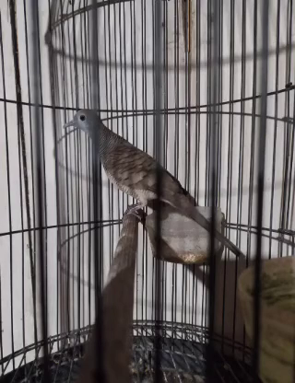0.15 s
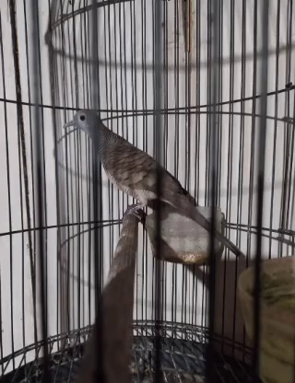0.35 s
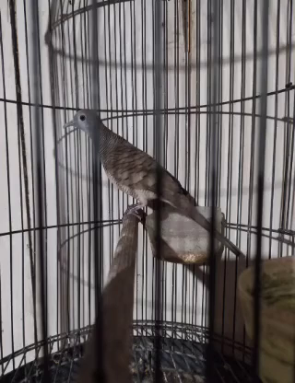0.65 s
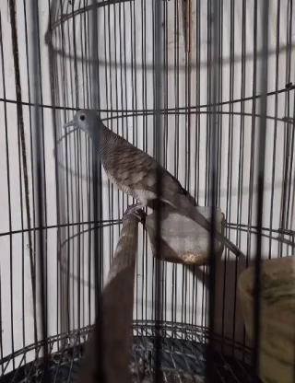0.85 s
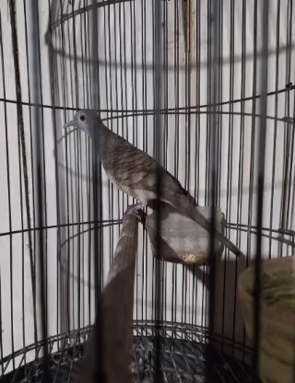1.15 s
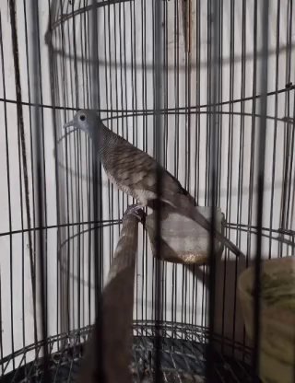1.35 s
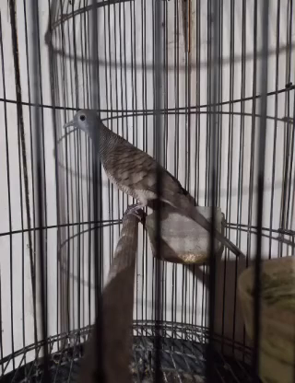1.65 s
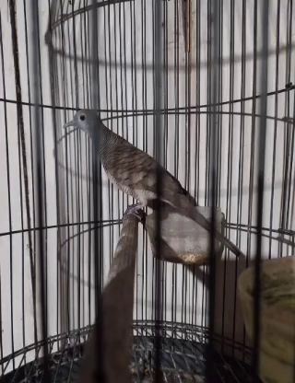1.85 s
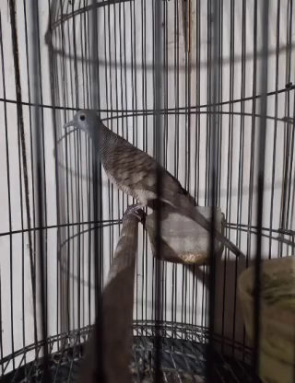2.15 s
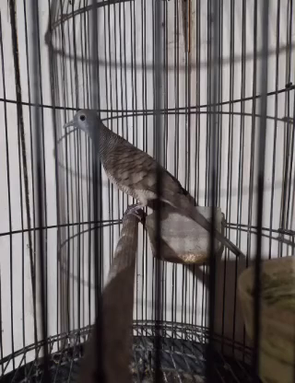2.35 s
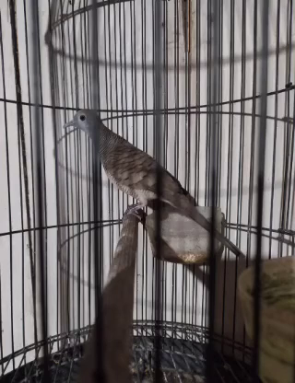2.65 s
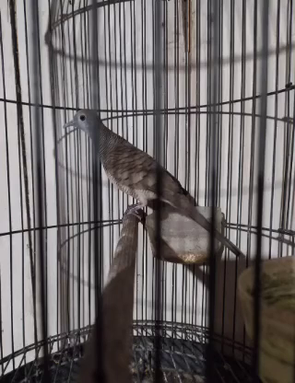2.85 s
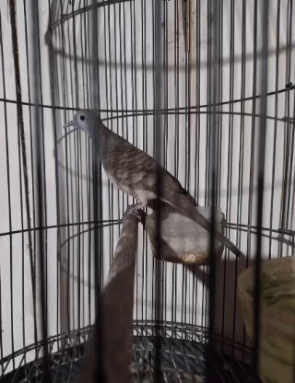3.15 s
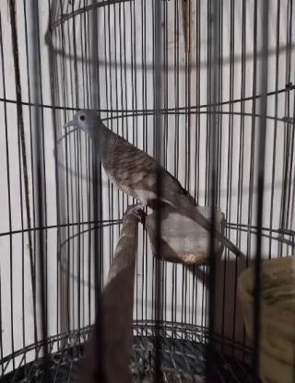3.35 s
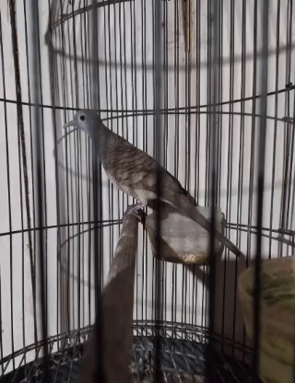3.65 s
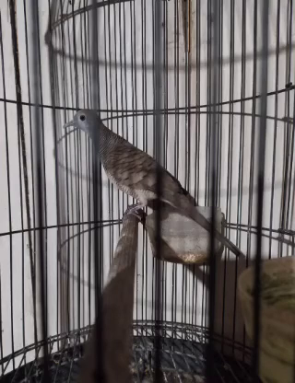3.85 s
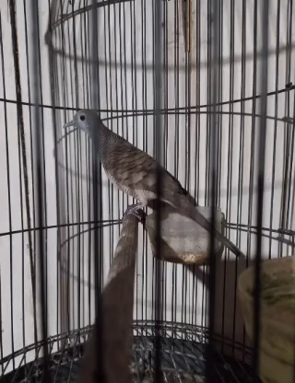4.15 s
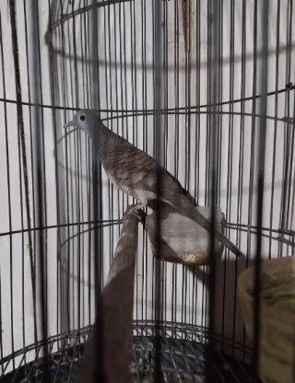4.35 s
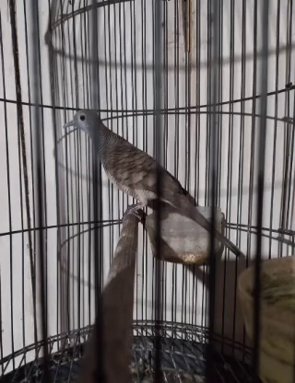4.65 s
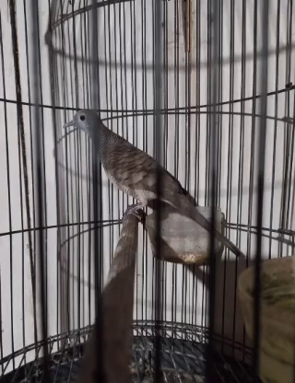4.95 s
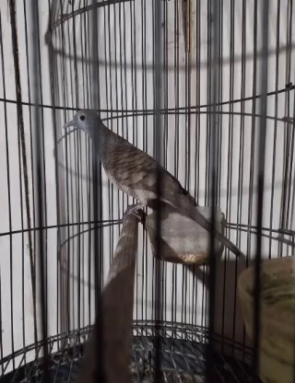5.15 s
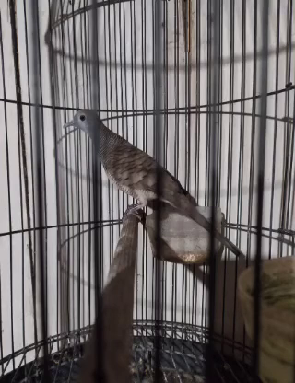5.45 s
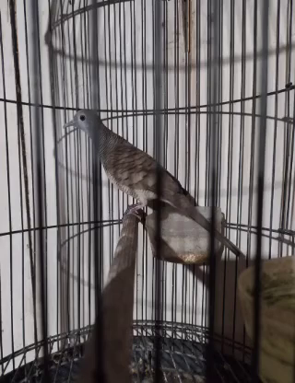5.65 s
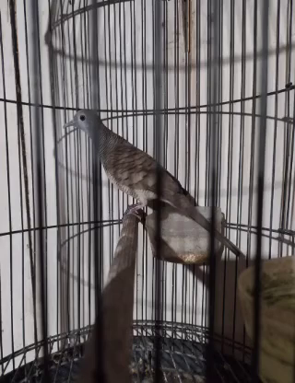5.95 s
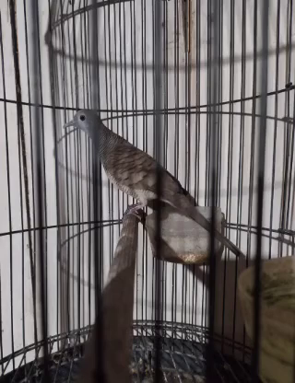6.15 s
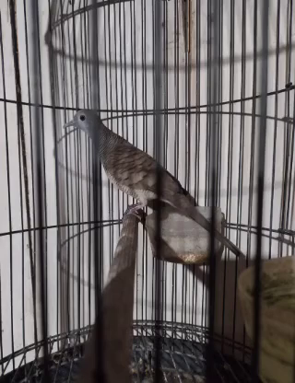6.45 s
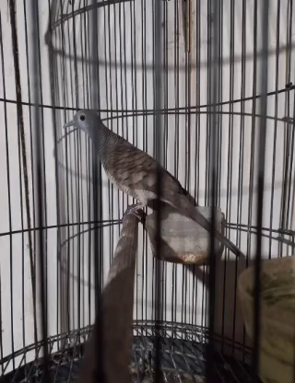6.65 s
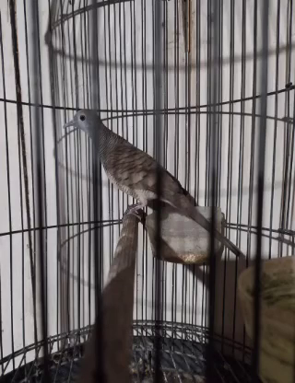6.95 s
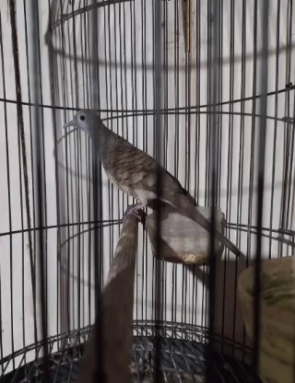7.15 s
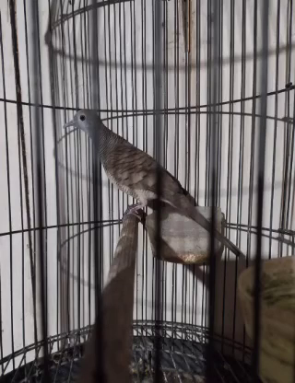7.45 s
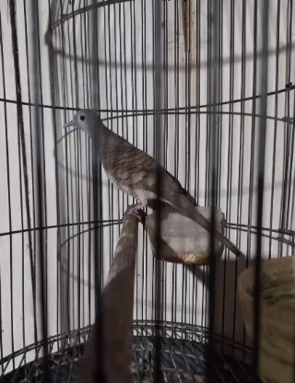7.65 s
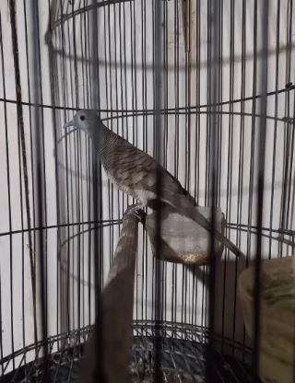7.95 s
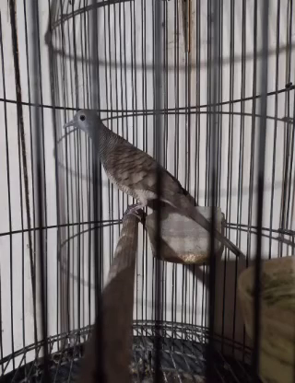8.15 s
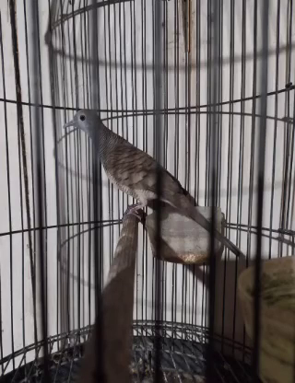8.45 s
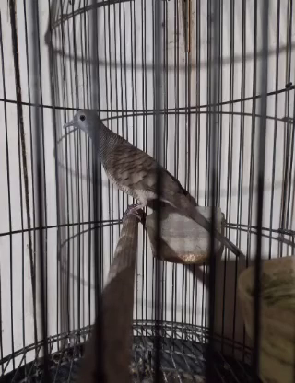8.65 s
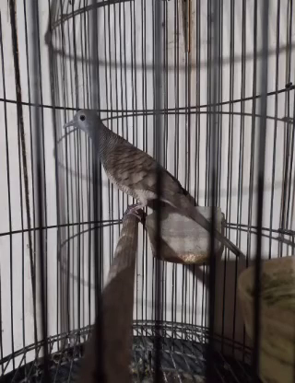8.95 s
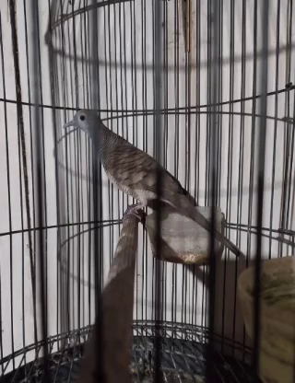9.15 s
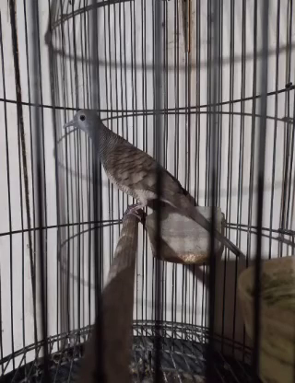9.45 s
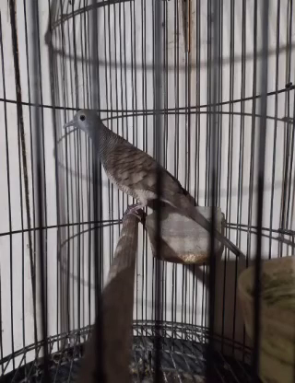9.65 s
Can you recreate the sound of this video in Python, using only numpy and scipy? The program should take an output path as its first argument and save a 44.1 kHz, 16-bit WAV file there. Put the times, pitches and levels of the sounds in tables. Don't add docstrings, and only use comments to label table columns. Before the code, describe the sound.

Hollow, reedy dove coos around a mid-high whistle pitch, loud and dry with slight wall echo. Four even coos come first, then four separate rapid phrases with gaps between. One soft distant reply follows the first phrase. Near the end a second bird rattles into a trill, then coos steadily. Behind are airy room noise, an early fading motor hum, muffled knocks and tiny cage ticks.

```python
import sys
import numpy as np
from scipy import signal
from scipy.fft import rfft, irfft, next_fast_len
from scipy.io import wavfile
from scipy.ndimage import uniform_filter1d, minimum_filter1d, map_coordinates

SR = 44100
rng = np.random.default_rng(int(sys.argv[2]) if len(sys.argv) > 2 else 0)


def transcribe(signal):
    frames = np.atleast_2d(signal).T
    limited = np.clip(frames, -1, 1)
    pcm = np.round(limited * 32767).astype(np.int16)
    wavfile.write(sys.argv[1], SR, pcm)


def convert_level_to_amplitude(level_db):
    exponent = np.asarray(level_db, float) / 20
    return 10 ** exponent


N = 432621

# t/s, creak/ms, bloom on the sac/ms, whistle/ms, top f/Hz
OPENERS_1 = [
    (0.9695, 22, 18, 75.3, 1360),
    (2.1807, 25.3, 13.6, 100, 1326),
    (3.5056, 26, 14.6, 139, 1309),
    (5.8218, 23.3, 15, 135.4, 1317),
]
# t/s, creak/ms, bloom/ms, whistle/ms, top f/Hz
COOS_1 = [
    (-0.085, 12, 7, 95, 1277),
    (0.0925, 11, 6.7, 95.3, 1289),
    (0.2905, 14, 7, 100, 1289),
    (0.5039, 14, 8.7, 100, 1280),
    (1.3205, 11.8, 8.2, 81, 1247),
    (2.5462, 11.8, 6.8, 71, 1230),
    (3.9945, 9.5, 7.5, 76, 1264),
    (6.2797, 11.6, 7.1, 80.2, 1255),
]
# t/s, creak/ms, bloom/ms, whistle/ms, top f/Hz
CHUCKS_1 = [(1.0938, 2.3, 7.4, 32, 1265), (1.1466, 7.4, 7.7, 30, 1232), (1.2232, 11.5, 7.1, 29, 1208),
            (2.322, 1.4, 6.2, 35, 1241), (2.3813, 8, 5.1, 24, 1181), (2.4544, 10.9, 6.7, 25, 1175),
            (3.6976, 7.3, 5.4, 24, 1168), (3.7671, 11.4, 5.6, 23, 1182), (3.8599, 8.5, 7.5, 37, 1207),
            (6.0027, 9.5, 5, 27, 1183), (6.0708, 10.9, 6.4, 22, 1155), (6.1557, 12.3, 5.5, 35, 1191)]
# t/s, peak level/dB
CLUCKS_1 = [
    (0.9383, -21.5),
    (2.1487, -19.5),
    (3.473, -22.5),
    (5.7888, -23.5),
]
OPENING_1 = dict(lock_hz=912, climb_hz=130, bloom_db=.6, onset_db=-3, low=0.076, settle_ms=11, sag=.055, bend=1.2, drop=.1, drop_ms=4.6, db=-0.04, dip_db=-6, dip_ms=39, swell_db=1.6, push_db=1, push_ms=19, push_width_ms=12, fade_db=-6, fade_ms=5, warble=0.059, warble_db=-5)
COOING_1 = dict(lock_hz=926.6, climb_hz=115, bloom_db=3.14, onset_db=-3.5, low=0.037, settle_ms=11, sag=0.062, bend=2.1, drop=.12, drop_ms=4.5, db=-3.5, dip_db=-0.7, dip_ms=9.9, swell_db=5.5, push_db=0.5, push_ms=14, push_width_ms=9.7, fade_db=-13.5, fade_ms=8, warble=0, warble_db=-3)
CHUCKING_1 = dict(COOING_1, onset_db=-3.5, low=0.01, settle_ms=3, sag=0.025, bend=1.1, db=-1, swell_db=-0.9, fade_ms=12)
# f/Hz, width/Hz, upper f/Hz, upper width/Hz, upper share
SAC_1 = (904, 188.6, 1195, 50, 0.088)
# f/Hz, level/dB
SKIN_1 = [(200, 6), (700, -2), (1400, 4), (1800, -10), (2200, -26), (3000, -43.5), (6000, -48.5),
          (12000, -79.5)]
# f/Hz, level/dB
THROAT_1 = [(1600, -86), (2100, -52.5), (2500, -34.5), (3800, -44), (5000, -52), (6200, -44.5), (7500, -68),
            (8800, -60), (10000, -77), (12500, -120)]


def first_dove():
    songs = [(OPENERS_1, OPENING_1), (COOS_1, COOING_1), (CHUCKS_1, CHUCKING_1)]
    creak = dict(creak_hz=231.3, soft_db=-8, rush_up=2.1, surge_db=0.5)
    return dove(songs, SAC_1, SKIN_1, THROAT_1, CLUCKS_1, creak, open_hz=1140, drive=0.32,
                jitter=0.0043, shimmer_db=0.09, breath_db=-3.0)


# t/s, creak/ms, bloom/ms, whistle/ms, top f/Hz
TRILL_2 = [
    (7.8774, 46, 28, 36, 1319),
    (7.988, 3.1, 19, 22, 1273),
    (8.036, 4.3, 18, 9, 1224),
    (8.0895, 11.7, 12, 3, 1057),
    (8.1585, 16.9, 11, 3, 1063),
    (8.2435, 10, 20, 9, 1158),
    (8.3323, 14.4, 14, 30, 1252),
]
# t/s, creak/ms, bloom/ms, whistle/ms, top f/Hz
COOS_2 = [
    (8.4571, 15.9, 11.8, 81, 1267),
    (8.6603, 14, 13.7, 97, 1275),
    (8.8776, 17, 14, 114, 1276),
    (9.117, 10.3, 16.9, 117, 1276),
]
# t/s, creak/ms, bloom/ms, whistle/ms, top f/Hz
LATE_2 = [
    (9.3586, 14.6, 11, 118, 1270),
    (9.5915, 14, 16.3, 110, 1272),
]
TRILLING_2 = dict(lock_hz=1052, climb_hz=87, bloom_db=3, onset_db=-4, low=0.019, settle_ms=3, sag=0.027, bend=1.4, drop=.07, drop_ms=4.9, db=-2.5, dip_db=-9.5, dip_ms=8.6, swell_db=-1.8, push_db=2.5, push_ms=5.1, push_width_ms=5, fade_db=-9.5, fade_ms=3, warble=0, warble_db=-1)
COOING_2 = dict(lock_hz=1018.4, climb_hz=72, bloom_db=0.76, onset_db=-2.5, low=0.026, settle_ms=5.8, sag=.03, bend=2.2, drop=0.14, drop_ms=7.3, db=-2.5, dip_db=-22, dip_ms=7.5, swell_db=-0.7, push_db=4, push_ms=17, push_width_ms=10, fade_db=-10.5, fade_ms=3.5, warble=0, warble_db=1)
TIRING_2 = dict(COOING_2, db=-2, swell_db=-6.5, push_db=8, push_ms=17)
# f/Hz, width/Hz, upper f/Hz, upper width/Hz, upper share
SAC_2 = (1037, 159, 1215, 110, 0.48)
# f/Hz, level/dB
SKIN_2 = [(300, 8.5), (600, -9), (1400, 2), (1800, -10.5), (2200, -22.5), (3000, -44.5), (6000, -40.5),
          (12000, -81)]
# f/Hz, level/dB
THROAT_2 = [(1600, -83), (2100, -26.5), (2500, -39.5), (3800, -46.5), (5000, -58), (6300, -60.5),
            (7500, -70), (8800, -75), (11500, -120)]


def second_dove():
    songs = [(TRILL_2, TRILLING_2), (COOS_2, COOING_2), (LATE_2, TIRING_2)]
    creak = dict(creak_hz=260.5, soft_db=-10.5, rush_up=2.9, surge_db=3.5)
    return dove(songs, SAC_2, SKIN_2, THROAT_2, [], creak, open_hz=1074, drive=0.14,
                jitter=0.004, shimmer_db=0.238, breath_db=-1.0)


def dove(songs, sac, skin, throat, clucks, creak, open_hz, drive, jitter, shimmer_db, breath_db):
    train, overtones = np.zeros((2, N))
    quaver = 1 + 0.005 * wobble(170)
    air = rng.standard_normal(N) * convert_level_to_amplitude(0.63 * wobble(300))
    for notes, way in songs:
        for note in notes:
            s, hz, db = note_path(note, way, **creak)
            t = np.arange(max(s[0], 0), s[-1], 1 / SR)
            here = slice(round(t[0] * SR), round(t[0] * SR) + len(t))
            pitch_now = np.interp(t, s, hz)
            cycles = np.cumsum(pitch_now * quaver[here]) / SR
            at = np.interp(np.arange(int(cycles[-1]) + 1), cycles, t)
            pitch, effort_db = np.interp(at, s, hz), np.interp(at, s, db)

            chance = rng.standard_normal((len(at), 2))
            loose = np.clip(sac[0] / pitch, 1, 9) ** 2
            size = convert_level_to_amplitude(effort_db + shimmer_db * loose * chance[:, 0]) * SR / 2 / np.maximum(pitch, sac[0])
            at = (at + jitter * loose * chance[:, 1] / pitch) * SR
            add(train, at, size)

            closing = np.clip((s[-1] - at / SR) / 0.015, 0, 1) ** 2
            opening = 1 / (1 + np.exp((open_hz - pitch) / 35))
            add(overtones, at, size * (0.019 + opening * closing) * convert_level_to_amplitude(drive * effort_db))
            shut = 1 / (1 + np.exp((pitch_now - open_hz) / 35))
            overtones[here] += convert_level_to_amplitude(np.interp(t, s, db) + breath_db) * shut * air[here]
    for s, db in clucks:
        train[round(s * SR)] += convert_level_to_amplitude(db + 36.5)

    def body(f):
        rings = resonance(f, *sac[:2]) * (1 + sac[4] * resonance(f, *sac[2:4]))
        return -rings * convert_level_to_amplitude(along(skin, f))

    def pipe_parts(f):
        return convert_level_to_amplitude(along(throat, f)) * np.array([f < 3000, (f >= 3000) & (f < 4400), f >= 4400])

    flutter = convert_level_to_amplitude(3.4 * np.array([wobble(45), wobble(60), wobble(70)]))
    beat = convert_level_to_amplitude(1.7 * wobble(350) + 0.53 * np.array([wobble(120), wobble(120)]))
    return filtered(train, body) + beat * np.sum(flutter * filtered(overtones, pipe_parts), axis=0)


def note_path(note, way, creak_hz, soft_db, rush_up, surge_db):
    start, creak_ms, bloom_ms, whistle_ms, top_hz = note
    jump = start + (creak_ms + bloom_ms) / 1000
    db = way["onset_db"]
    u = np.linspace(0, 1, 12)
    climb = creak_hz * (way["lock_hz"] / creak_hz) ** (u ** rush_up)
    creak_db = db + soft_db * (1 - u) ** 4 + surge_db * u ** 4
    creak = np.transpose([start + u * creak_ms / 1000, climb, creak_db])
    bloom = (jump - 0.0015, min(way["lock_hz"] + way["climb_hz"], top_hz), db + way["bloom_db"])
    ms, free_hz, free_db = whistle(whistle_ms, top_hz, way)
    tune = np.transpose([jump + ms / 1000, free_hz, free_db])
    shuts = (tune[-1][0] + 0.002, tune[-1][1], tune[-1][2] - 18)
    s, hz, db = np.transpose([*creak, bloom, *tune, shuts])
    return np.maximum.accumulate(s), hz, db


def whistle(length_ms, top_hz, way):
    jump_ms, swell_ms = 3, 67
    length_ms = max(length_ms, jump_ms + 0.5)
    ms = np.append(np.arange(jump_ms, length_ms, 1), length_ms)
    after, left = ms - jump_ms, length_ms - ms
    dips = sum(np.exp(-np.abs(ms - dip_ms) / 8) for dip_ms in (62, 104))
    share = (1 - way["low"] * np.exp(-after / way["settle_ms"])
             - way["sag"] * (ms / length_ms) ** way["bend"]
             - way["drop"] * np.exp(-left / way["drop_ms"])
             - way["warble"] * dips)
    db = (way["db"] + way["dip_db"] * np.exp(-after / way["dip_ms"])
          + way["swell_db"] * np.tanh(after / swell_ms)
          + way["push_db"] * np.exp(-((left - way["push_ms"]) / way["push_width_ms"]) ** 4)
          + way["fade_db"] * np.exp(-left / way["fade_ms"])
          + way["warble_db"] * dips)
    return ms, top_hz * share, db


# t/s, length/ms, top f/Hz, level/dB
FAR = [
    (1.495, 48, 1135, -29),
    (1.588, 29, 1074, -41.5),
    (1.643, 36, 1139, -32),
    (1.711, 39, 1155, -31),
    (1.786, 44, 1170, -30.5),
    (1.884, 48, 1178, -27),
    (2.01, 69, 1148, -26.5),
]


def far_dove():
    sound = np.zeros(N)
    for s, ms, top_hz, db in FAR:
        u = np.linspace(0, 1, round(ms * SR / 1000))
        hz = top_hz * (1 - 0.73 * np.exp(-u * ms / 8.1) - 0.019 * u ** 4)
        swell = np.sin(np.pi * u ** 2.9) ** 0.52 + 0.054 * np.sin(np.pi * u)
        edges = np.minimum(u * ms / 3, 1) * np.minimum((1 - u) * ms / 3, 1)
        tone = np.sin(2 * np.pi * np.cumsum(hz) / SR)
        sound[round(s * SR):][:len(u)] += convert_level_to_amplitude(db + 2) * swell * edges * tone
    return sound


# t/s, peak level/dB
TICKS = [
    (0.3056, -43.5),
    (3.2575, -67),
    (7.521, -67.5),
    (8.678, -45.5),
]


def cage():
    ticks, t = np.zeros(N), np.arange(400) / SR
    for s, db in TICKS:
        ticks[round(s * SR):][:400] += convert_level_to_amplitude(db - 60 * t / 0.005) * rng.standard_normal(400)
    return filtered(ticks, lambda f: resonance(f, 8000, 7000) ** 2)


# f/Hz, left-right level/dB
LEAN = [(500, 1.3), (2000, 1.34), (5000, 2.5), (10000, -0.5)]


def at_phone(x):
    def ports(f):
        level = convert_level_to_amplitude(along(LEAN, f) * [[0.5], [-0.5]])
        delay = np.exp(-1j * np.pi * f * 1.3e-5 * np.array([[1], [-1]]))
        return level * delay
    return filtered(x, ports)


# f/Hz, time to fall 60 dB/s
ROOM = [(300, 0.097), (1200, 0.37), (2500, 0.16), (10000, 0.14)]
# delay/ms, left level/dB, right level/dB
WALLS_1 = [
    (5.15, -27, -22.5),
    (48, -30, -29.5),
]
# delay/ms, left level/dB, right level/dB
WALLS_2 = [
    (6.084, -12, -19),
    (24.92, -20, -26.5),
    (47, -26.5, -22.5),
]


def room(x, walls, wet_db, alike):
    hz, t, z = signal.stft(rng.standard_normal((2, SR // 2)), SR, nperseg=256)
    tail = signal.istft(z * convert_level_to_amplitude(-60 * t / along(ROOM, hz)[:, None]), SR, nperseg=256)[1]
    spread = (1 - alike) * tail[1] * [[1], [-1]]
    tail = convert_level_to_amplitude(wet_db) * (tail[0] + spread) / np.linalg.norm(tail[0])
    tail = np.pad(tail, ((0, 0), (500, 0)))
    for ms, left_db, right_db in walls:
        tail[:, round(ms * SR / 1000)] += convert_level_to_amplitude([left_db, right_db])
    return signal.fftconvolve(x[:1], tail, axes=1)[:, :N]


# t/s, level/dB, centre f/Hz, width/Hz, time to fall 60 dB/s
THUMPS = [
    (2.65, -43, 505, 120, 0.79),
    (2.652, -39.5, 140, 56.3, 0.5),
    (4.157, -39, 446, 125, 1),
    (4.649, -36, 740, 704, 0.85),
    (7.331, -42, 130, 120, 0.93),
    (7.981, -39, 56, 60, 0.41),
    (9.03, -40.5, 1700, 60, 0.5),
]


def thumps():
    sound = np.zeros(N)
    t, f = np.arange(SR) / SR, np.arange(SR // 2 + 1)
    for s, db, hz, width, t60 in THUMPS:
        through_wall = resonance(f, hz, width) ** 2 / (1 + (f / 3800) ** 4)
        band = np.fft.irfft(rfft(rng.standard_normal(SR)) * through_wall, SR)
        thump = convert_level_to_amplitude(db - 60 * t / t60) * (1 - np.exp(-t / 0.0089)) * unit(band)
        start = round(s * SR)
        sound[start:][:SR] += thump[:N - start]
    return sound


# t/s, level/dB
HUM = [
    (0, -49.5),
    (.3, -49.5),
    (.8, -43.5),
    (1.4, -50),
    (1.8, -61.5),
    (2.3, -85.5),
]


def hum():
    hum_db, = curves(HUM)
    hz = 150 + 3 * wobble(7)
    return convert_level_to_amplitude(hum_db + 1.5 + 1.7 * wobble(14)) * np.sin(2 * np.pi * np.cumsum(hz) / SR)


# t/s, rumble level/dB, air level/dB
HOUSE = [(0, -48, -51.5), (1.6, -49, -49), (2.2, -49, -50), (3.1, -48.5, -51), (4, -50, -51),
         (5.2, -50, -52.5), (5.7, -51.5, -51), (6.7, -50.5, -53), (7.3, -48.5, -52), (7.6, -43, -52.5),
         (8.3, -44.5, -52), (9.81, -46, -52.5)]
# f/Hz, level/dB per Hz
RUMBLE = [(15, -44), (30, -12), (50, -3), (120, 2.5), (200, -2), (320, -13), (600, -33.5), (1000, -120)]
# f/Hz, level/dB per Hz
AIR = [(120, -43), (250, 0), (500, -2.5), (1000, -9.5), (1600, -12.5), (2500, -19), (4000, -27),
       (6300, -33), (8500, -37.5), (10500, -44.5), (13000, -82)]


def house():
    rumble_db, air_db = curves(HOUSE)
    rumble = convert_level_to_amplitude(rumble_db + 1.5 * wobble(5.4)) * rush(RUMBLE, patchy_db=0.5)
    air = convert_level_to_amplitude(air_db + 0.45 * wobble(7)) * rush(AIR, patchy_db=1.6)
    return rumble + air


# f/Hz, likeness (1 = the same)
ALIKE = [(60, 0.98), (180, 1), (550, 0.97), (1650, 0.95), (4960, -0.021), (15000, 0.91)]


def rush(spectrum, patchy_db):
    z = signal.stft(rng.standard_normal((2, N)), nperseg=512)[2]
    field = uniform_filter1d(uniform_filter1d(rng.standard_normal(z.shape[1:]), 5, 0), 12, 1)
    pair = signal.istft(z * convert_level_to_amplitude(patchy_db * unit(field)), nperseg=512)[1][:, :N]

    def colour(hz):
        turn = np.arccos(np.clip(along(ALIKE, hz), -1, 1)) / 2
        return convert_level_to_amplitude(along(spectrum, hz)) * [np.cos(turn), np.sin(turn)]

    mid, side = filtered(pair, colour)
    return unit(np.array([mid + side, mid - side]))


def unit(x):
    return x / np.sqrt(np.mean(x ** 2) + 1e-20)


def along(points, hz):
    f, v = np.transpose(points)
    return np.interp(np.log(hz + 1), np.log(f + 1), v)


def curves(rows):
    s, *cols = np.transpose(rows)
    return [np.interp(np.arange(N) / SR, s, c) for c in cols]


def wobble(rate):
    return map_coordinates(rng.standard_normal(int(N * rate / SR) + 4), [np.arange(N) * rate / SR])


def filtered(x, response):
    m = next_fast_len(N + SR // 2)
    return irfft(rfft(x, m) * response(np.fft.rfftfreq(m, 1 / SR)), m)[..., :N]


def resonance(f, hz, width):
    return 1j * f * width / (hz * hz - f * f + 1j * f * width)


def add(train, at, size):
    taps = np.floor(at)[:, None] + np.arange(-7, 9)
    away = taps - at[:, None]
    shape = np.sinc(away) * np.cos(np.pi * away / 16) ** 2
    where = np.clip(taps, 0, N - 1).astype(int)
    train += np.bincount(where.ravel(), (size[:, None] * shape * (taps >= 0)).ravel(), N)


def scene():
    first, second, far = first_dove(), second_dove(), far_dove()
    direct = at_phone(first + second + cage())
    echoes = room(first + 3.3 * far, WALLS_1, wet_db=-22.5, alike=0.85)
    echoes += room(second, WALLS_2, wet_db=-21.5, alike=0.55)
    home = (house() + hum() + thumps()) * convert_level_to_amplitude([[0.3], [-0.3]])
    return direct + far + echoes + home


def low_pass(x):
    return signal.sosfilt(signal.butter(12, 15560, fs=SR, output="sos"), x)


def record(dry):
    crest = -minimum_filter1d(-np.abs(dry).max(axis=0), size=50, origin=24)
    slow = signal.lfilter([0.012], [1, -0.988], crest)
    held = dry / (1 + (slow / 1.3) ** 6) ** (1 / 6)
    held = held / (1 + np.abs(held / 0.995) ** 12) ** (1 / 12)
    return low_pass(held)


dry = scene()
out = record(dry)
transcribe(out)
```